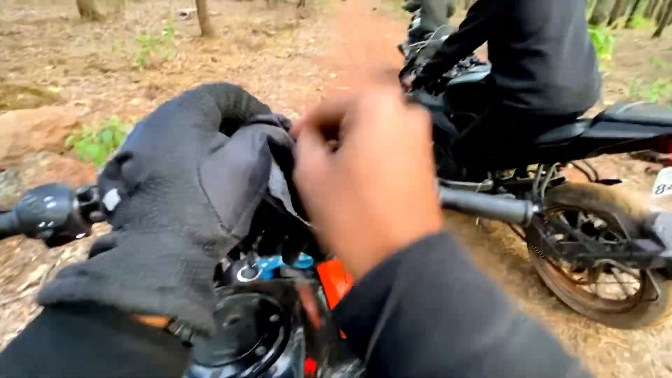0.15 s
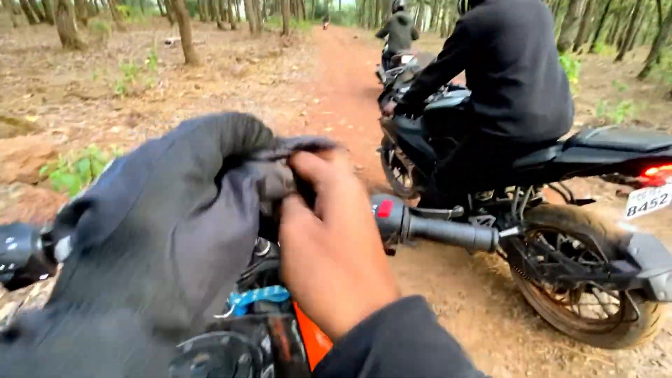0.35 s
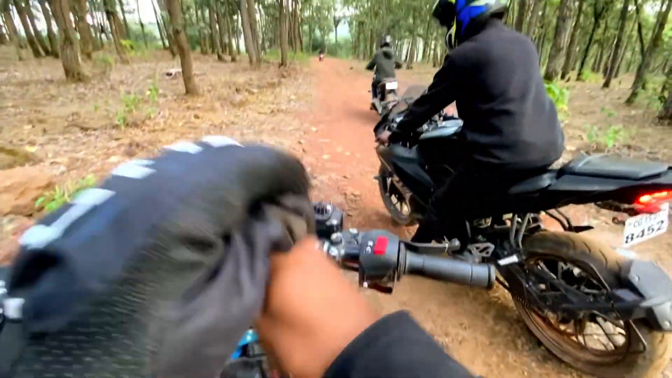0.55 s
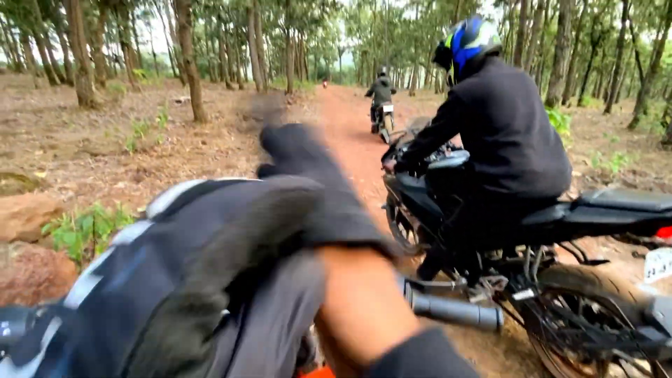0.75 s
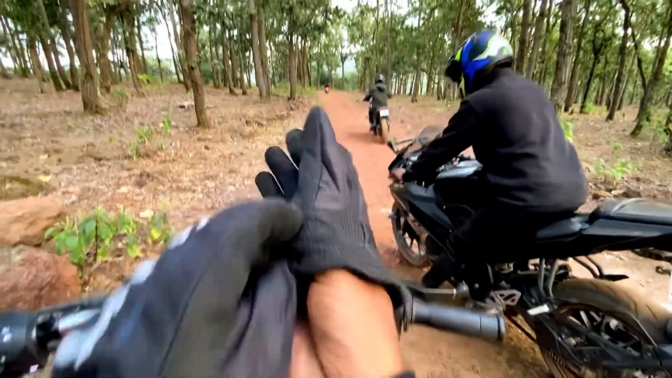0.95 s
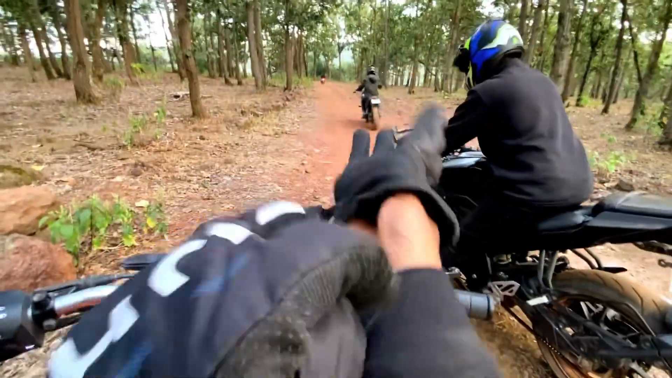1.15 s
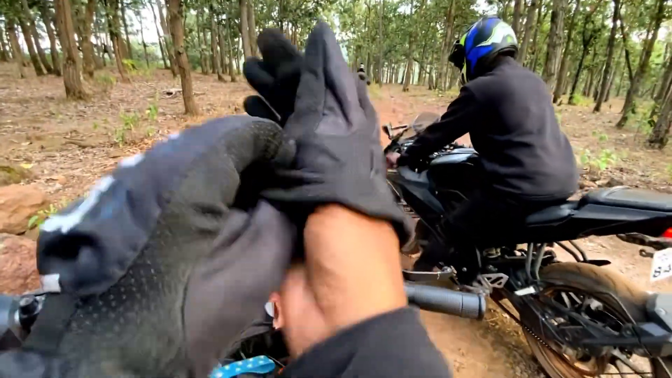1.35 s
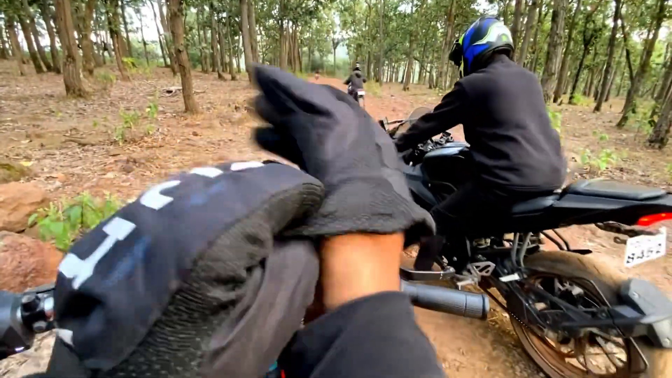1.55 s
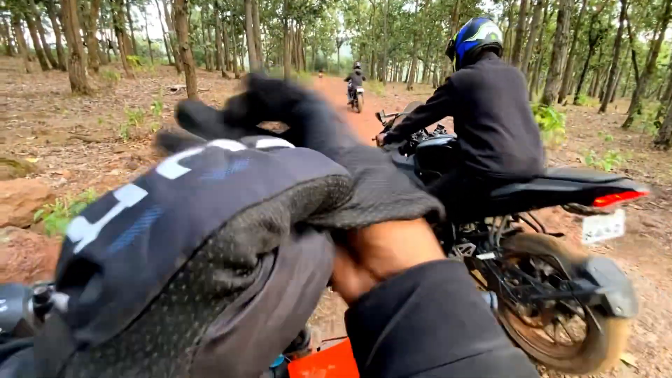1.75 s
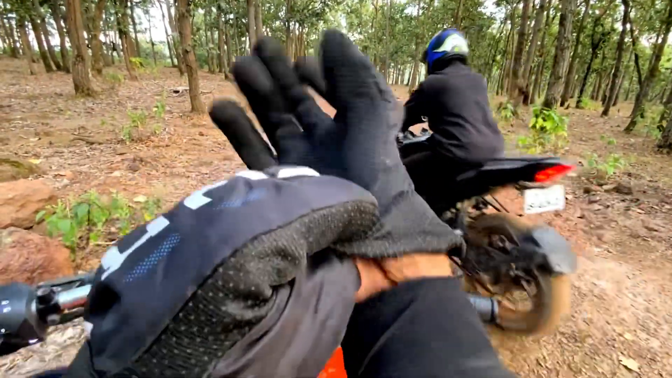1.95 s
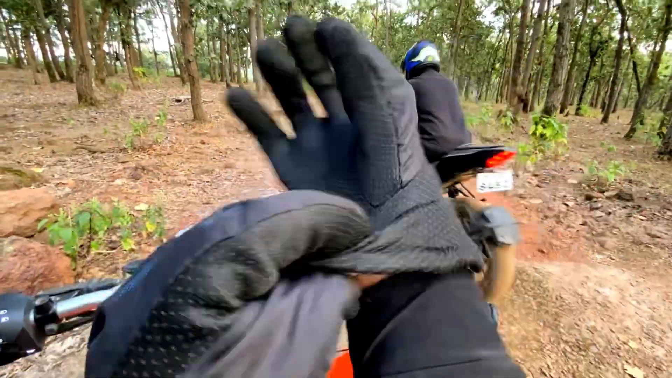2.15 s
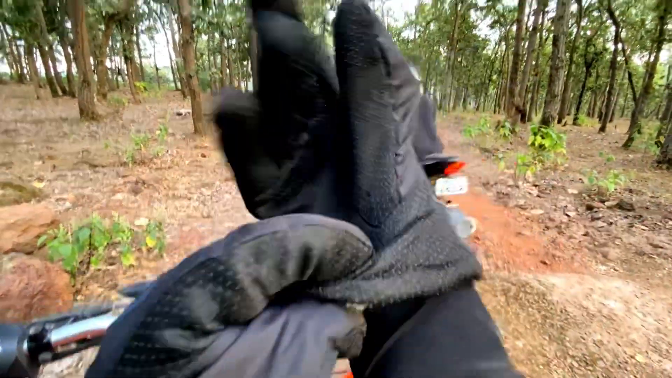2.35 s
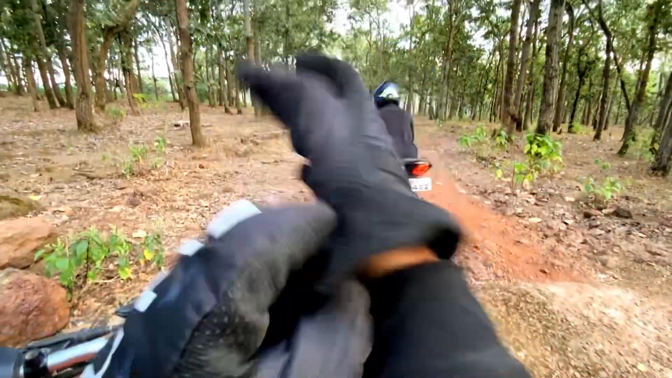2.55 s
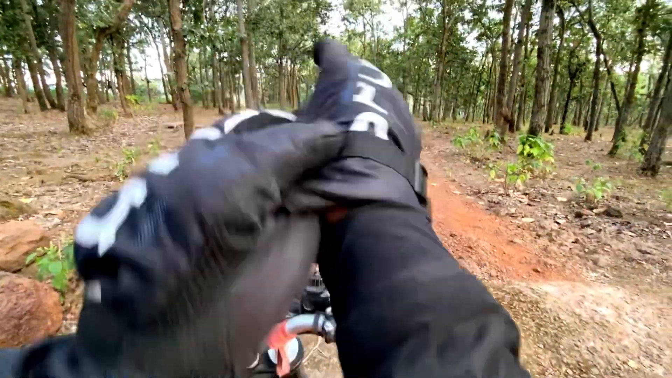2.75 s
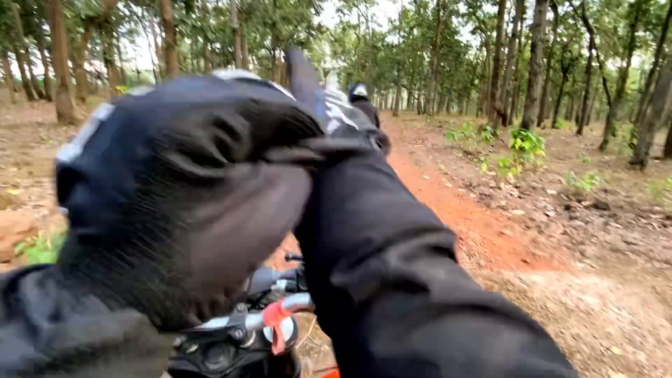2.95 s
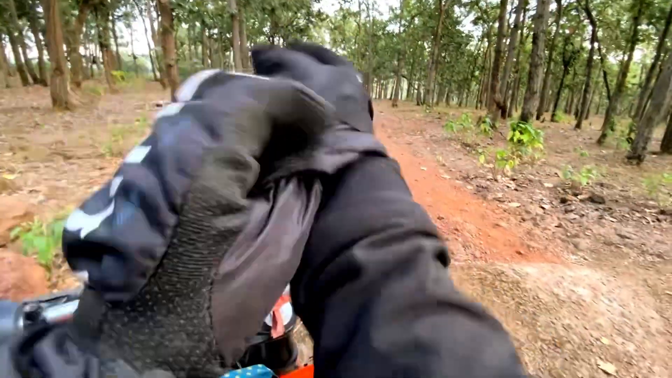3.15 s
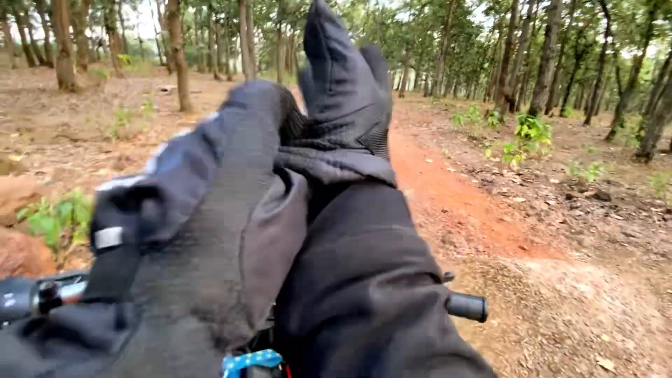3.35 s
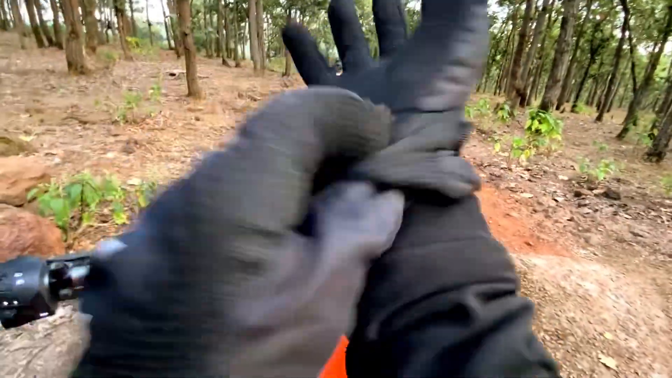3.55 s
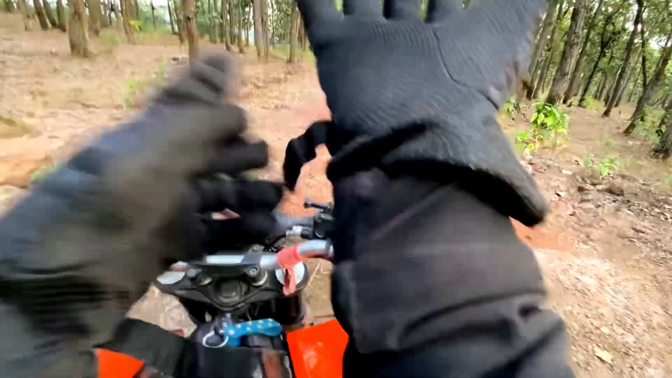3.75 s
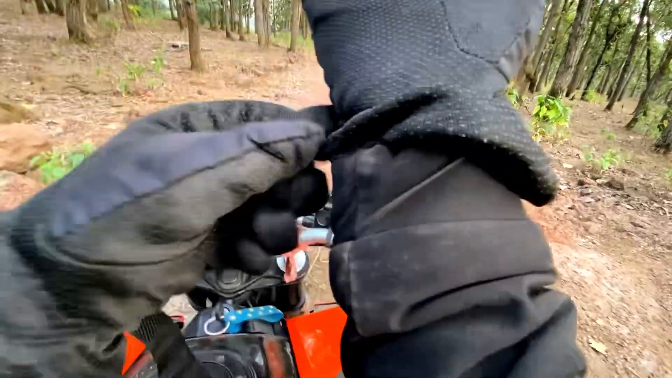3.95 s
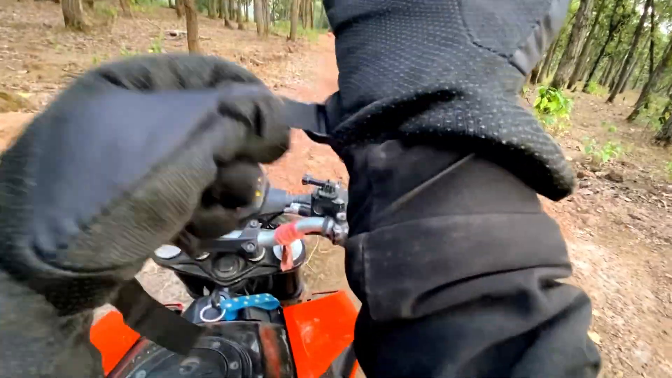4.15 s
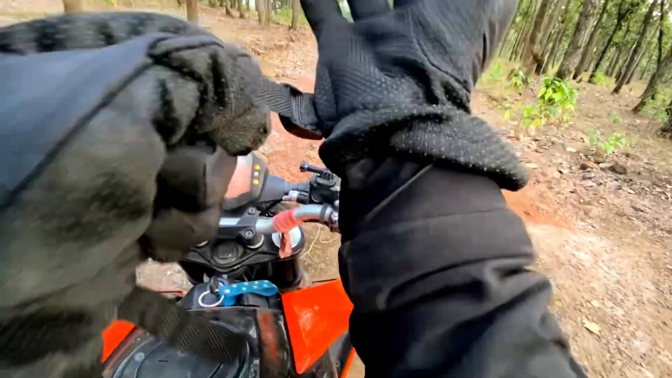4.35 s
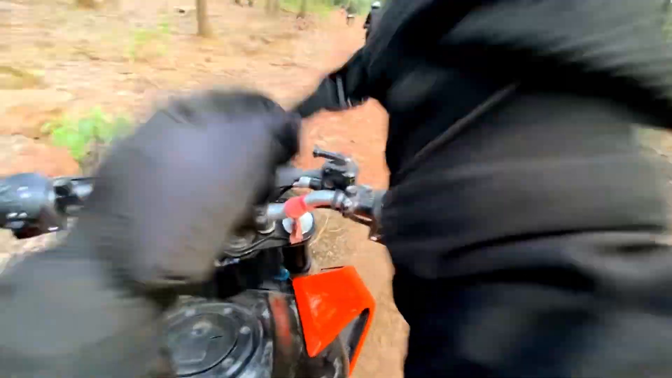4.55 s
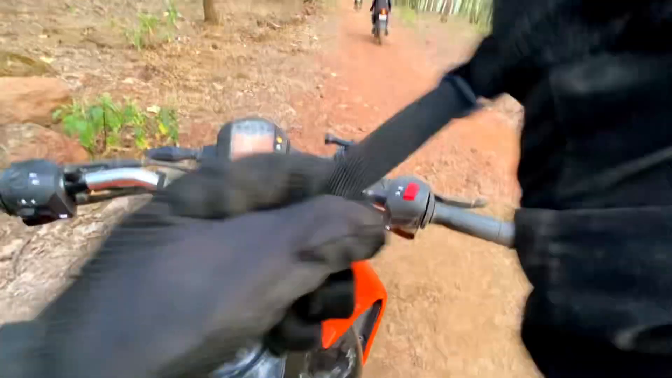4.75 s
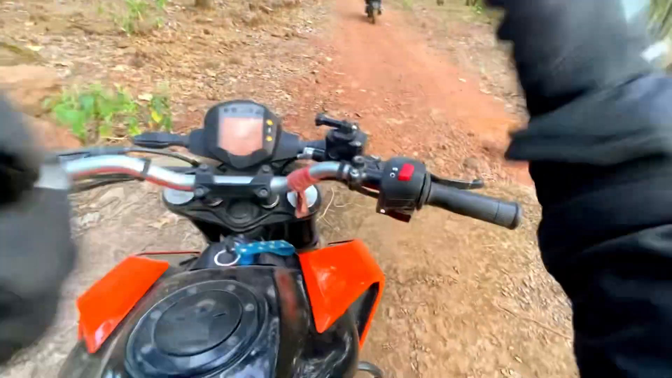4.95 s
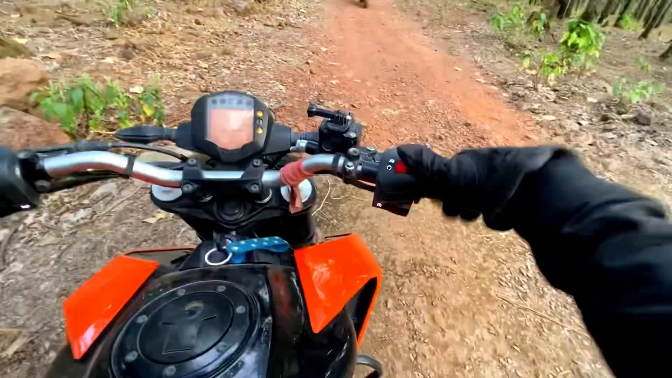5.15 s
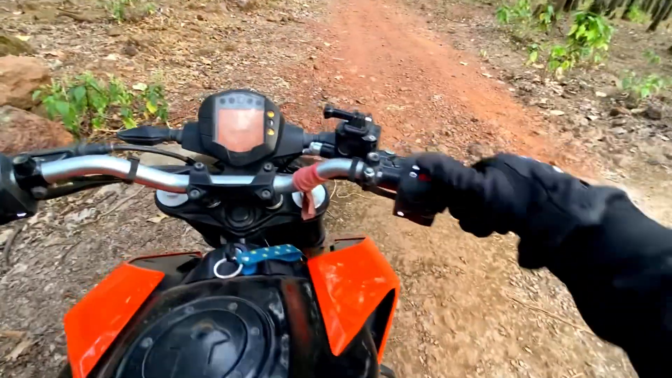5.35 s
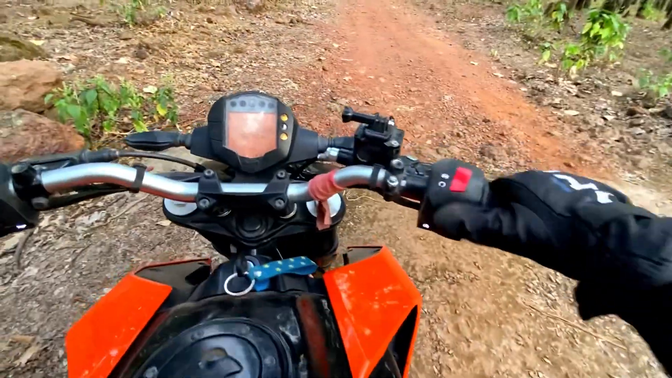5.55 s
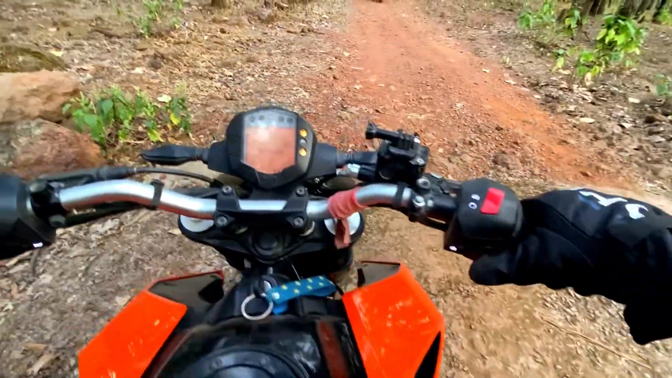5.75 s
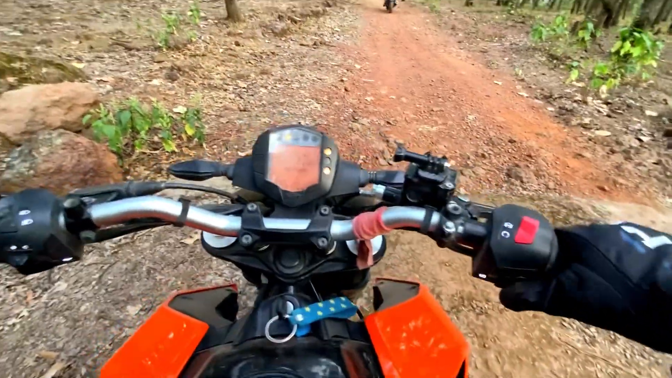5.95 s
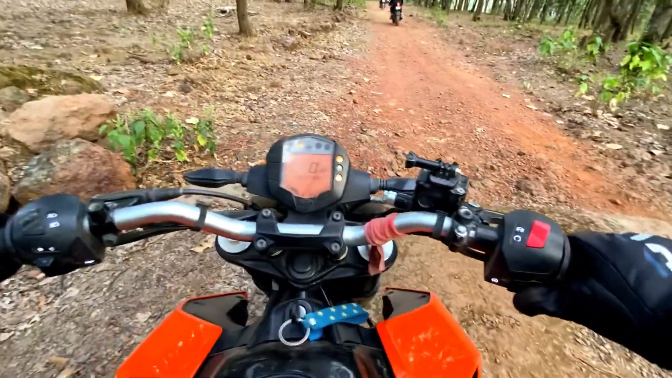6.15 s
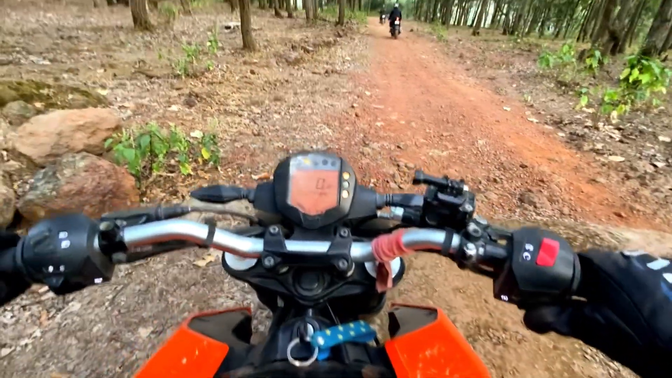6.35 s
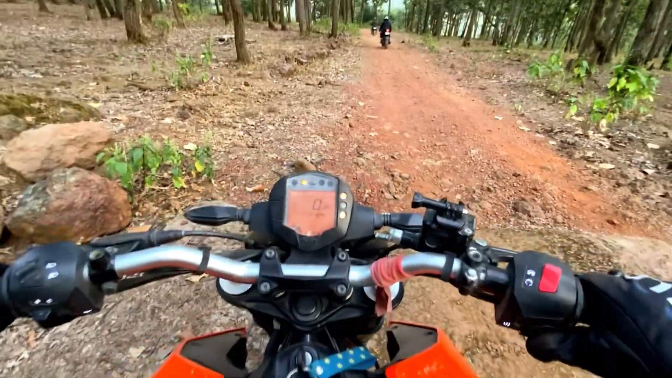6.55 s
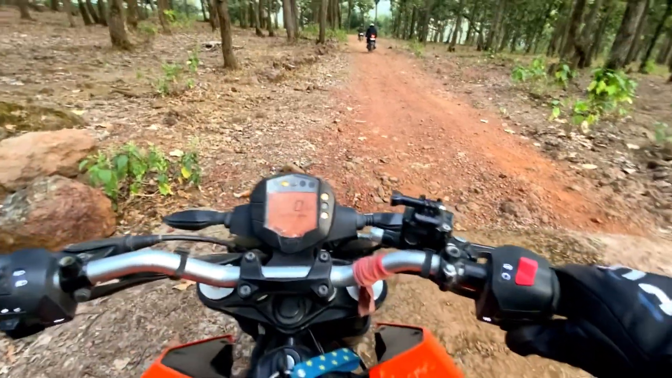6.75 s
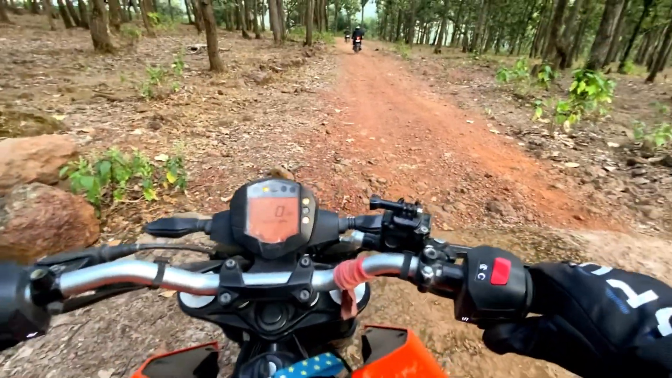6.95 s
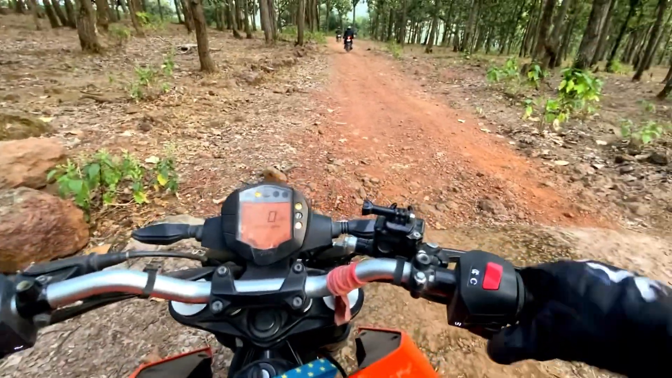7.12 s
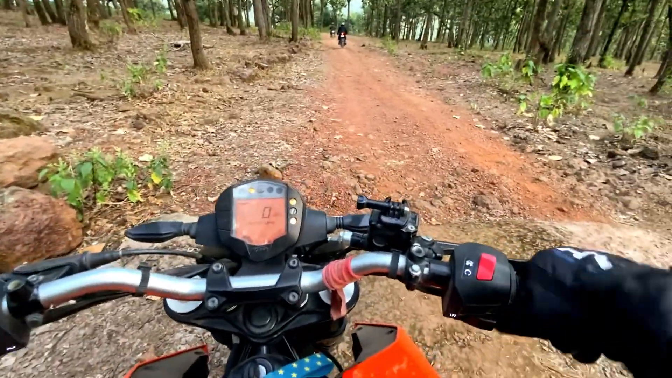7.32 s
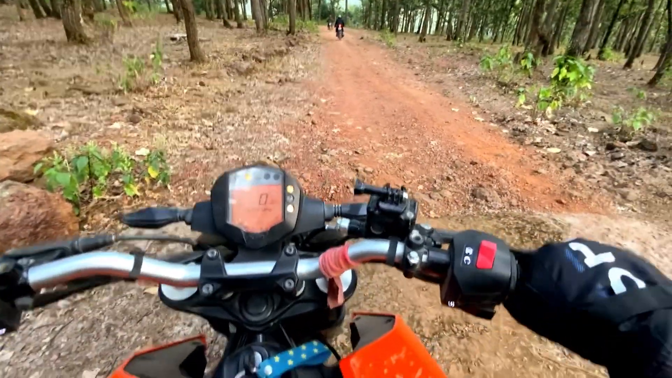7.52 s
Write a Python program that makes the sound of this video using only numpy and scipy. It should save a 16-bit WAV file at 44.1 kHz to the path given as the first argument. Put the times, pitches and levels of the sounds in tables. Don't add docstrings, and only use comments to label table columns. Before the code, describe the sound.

Muffled motorcycle idles, revs and pulls away while gloves slap and snap close by, then a starter grinds and a nearer engine fires.

```python
import sys
import numpy as np
from scipy import signal
from scipy.fft import rfft, irfft, next_fast_len
from scipy.io import wavfile
from scipy.ndimage import map_coordinates

SR = 44100
rng = np.random.default_rng(int(sys.argv[2]) if len(sys.argv) > 2 else 0)


def ratio_of_db(decibels):
    return 10 ** (np.asarray(decibels, float) / 20)


def dump(signal):
    limited = np.clip(np.atleast_2d(signal).T, -1, 1)
    pcm = np.round(limited * 32767).astype(np.int16)
    wavfile.write(sys.argv[1], SR, pcm)


N = 338688
T = np.arange(N) / SR
CRUISE = 20


def unit(x):
    return x / np.sqrt(np.mean(x ** 2) + 1e-20)


def curves(rows, t=T):
    s, *cols = np.transpose(rows)
    return [np.interp(t, s, c) for c in cols]


def wobble(rate):
    return map_coordinates(rng.standard_normal(int(N * rate / SR) + 4), [T * rate])


def filtered(x, response):
    m = next_fast_len(N + 8192)
    return irfft(rfft(x, m) * response(np.fft.rfftfreq(m, 1 / SR)), m)[:N]


def noise(spectrum):
    f, db = np.transpose(spectrum)

    def colour(hz):
        return ratio_of_db(np.interp(np.log(hz + 1), np.log(f), db))
    return unit(filtered(rng.standard_normal(N), colour))


def resonance(f, hz, width):
    return 1j * f * width / (hz * hz - f * f + 1j * f * width)


def bell(centre, half):
    return np.exp(-.5 * ((T - centre) / half) ** 2)


def crank(speed):
    turning = (T >= speed[0][0]) & (T < speed[-1][0])
    return np.cumsum(curves(speed)[0] * turning) / SR


def valve_beat(cycles, depth_db, lag):
    turn = 2 * np.pi * (cycles - lag)
    return ratio_of_db(depth_db * (np.cos(turn) + 0.21 * np.cos(2 * turn)))


def strengths(speed, load, tail, t):
    gulp_db, gulp_slope, ring_db, ring_slope, _ = tail
    revs = curves(speed, t)[0] - CRUISE
    ring_floor_db = -10.5
    late_db = np.maximum(ring_db + ring_slope * revs, ring_floor_db)
    return curves(load, t)[0], gulp_db + gulp_slope * revs, late_db


def exhaust(speed, load, tail, pipe, shell, scatter_db, gulp_s, jitter_s):
    fired = np.r_[speed[0][0], T[1:][np.diff(np.floor(crank(speed))) > 0]]
    chance = rng.standard_normal((len(fired), 14))
    bang_db, gulp_db, late_db = np.array(strengths(speed, load, tail, fired))[:, :, None]
    t = np.arange(-SR // 50, SR // 12) / SR

    bumps = []
    for k, (delay, part, width) in enumerate(pipe):
        size = part * ratio_of_db(scatter_db * chance[:, [6 + k]])
        arrival = delay + jitter_s * chance[:, [1 + k]]
        bumps.append(size * np.exp(-.5 * ((t - arrival) / width) ** 2))

    rings = 0
    for start, hz, db, t60 in shell:
        u = np.clip(t - start, 0, None)
        rings = rings + ratio_of_db(db - 60 * u / t60) * (1 - np.exp(-u / 0.0026)) * np.sin(2 * np.pi * hz * u)

    u = np.clip(t - .005, 0, None) / gulp_s
    gulp = ratio_of_db(gulp_db + 2 * scatter_db * chance[:, [12]]) * np.e * u * np.exp(-u)
    late = ratio_of_db(late_db) * (bumps[-1] + ratio_of_db(2 * scatter_db * chance[:, [13]]) * rings)
    shots = ratio_of_db(bang_db + scatter_db * chance[:, [0]]) * (sum(bumps[:-1]) + late + gulp)
    where = np.round((fired[:, None] + t) * SR).astype(int) + SR
    return np.bincount(where.ravel(), shots.ravel(), N + 2 * SR)[SR:SR + N]


def hum(speed, load, tail, orders):
    muffle_hz = 447
    bang_db, _, late_db = strengths(speed, load, tail, T)
    cycles, rate = crank(speed), curves(speed)[0]
    runs_to_end = speed[-1][0] >= T[-1]
    running = np.clip(cycles / 2, 0, 1) * np.clip((speed[-1][0] - T) * 20 + runs_to_end, 0, 1)
    tones = 0
    for k, db in orders:
        muffled = 1 / (1 + (k * rate / muffle_hz) ** 12)
        tones = tones + ratio_of_db(db + 2.1 * wobble(2.3)) * np.sin(2 * np.pi * round(k) * cycles) * muffled
    return ratio_of_db(bang_db + late_db / 2) * running * tones


# (frequency [Hz], density [dB per Hz])
HISS = [(300, -56), (800, 7), (1400, -4), (2400, -6), (3400, -13.5), (5500, -17), (9000, -20.5),
        (15500, -24.5)]


def hiss():
    return ratio_of_db(-70.5) * noise(HISS)


# (time [s], peak level [dB])
GUSTS = [(.3, -36), (1.15, -29.5), (1.45, -35), (1.86, -32), (2.46, -32.5), (2.8, -41), (3.5, -33),
         (4.62, -37), (4.9, -34.5), (6.65, -37), (6.87, -34.5), (7.25, -35), (7.68, -21.5)]
# (frequency [Hz], density [dB per Hz])
BUFFET = [(6, -14), (14, 0), (24, -3), (45, -8), (80, -18), (140, -28), (250, -120)]


def buffeting():
    breeze_db, gust_s = -41, 0.092
    gusts = ratio_of_db(breeze_db) + sum(ratio_of_db(db) * bell(s, gust_s) for s, db in GUSTS)
    return ratio_of_db(-4) * gusts * unit(noise(BUFFET) * ratio_of_db(2.3 * wobble(7.4)))


# (frequency [Hz], density [dB per Hz])
RUSH = [(40, -120), (70, -6), (130, -6), (200, -8.5), (300, -13), (410, -16.5), (500, -29), (800, -120)]


def gas_rush():
    puff_db, puff_lag = 2.5, .12
    catch_s = 0.12
    rush_rule = (-41.5, 0.25, 2.6)
    leader = ratio_of_db(curves(LEADER_LOAD)[0] + LEADER_TAIL[-1])
    neighbour = ratio_of_db(receding(rush_rule)) * valve_beat(crank(NEIGHBOUR_SPEED), puff_db, puff_lag)
    flow = np.clip((T - NEAR_SPEED[0][0]) / catch_s, .35, 1) * (T > GEARS[0][0])
    near = ratio_of_db(curves(NEAR_LOAD)[0] + NEAR_TAIL[-1]) * flow
    near = near * valve_beat(crank(NEAR_SPEED), puff_db, puff_lag)
    gas = np.sqrt(leader ** 2 + neighbour ** 2 + near ** 2)
    return ratio_of_db(-1.0) * gas * unit(noise(RUSH) * ratio_of_db(2.2 * wobble(25)))


# (time [s], half length [s], level [dB])
RUSTLES = [(0.557, 0.055, -68.5), (1.899, 0.023, -53), (2.4, 0.046, -67.5), (2.784, 0.037, -69.5),
           (3.464, 0.036, -69.5), (4.615, 0.032, -71), (4.789, 0.061, -71), (5.232, 0.015, -75)]
# (frequency [Hz], density [dB per Hz])
CLOTH = [(900, -41), (1600, 5), (2450, 1), (3500, -12), (5500, -16.5), (8000, -29), (14000, -63)]


def rustle():
    strokes = sum(ratio_of_db(db) * bell(s, half) for s, half, db in RUSTLES)
    return strokes * unit(noise(CLOTH) * ratio_of_db(4.5 * wobble(120)))


# (time [s], speed [firings per s])
LEADER_SPEED = [(0.027, 20.03), (0.25, 22.14), (0.5, 23.82), (0.75, 25.74), (0.98, 29.61), (1.2, 33.48)]
# (time [s], level [dB])
LEADER_LOAD = [(0, -25.5), (.5, -27.5), (0.801, -31), (0.949, -30.5), (1.2, -44)]
# (delay [s], size [of full], width [s])
LEADER_PIPE = [(-.004, -.4, .002), (-.0014, -.7, .0009), (.0004, .9, .0009), (.017, -.5, .002),
               (.0099, .8, .0013)]
# (start [s], frequency [Hz], level [dB], t60 [s])
LEADER_SHELL = [(-.001, 203, -9.5, 0.1), (-.001, 312, -13, 0.14), (-.001, 423, -19.5, 0.15)]
# (multiple of firing rate [1], level below the bang [dB])
LEADER_ORDERS = [(8, -24), (9, -16.5), (13, -27), (14, -26), (17, -29), (18, -29)]
# (slow gulp [dB], its change [dB per firing/s],
# shell ring [dB], its change [dB per firing/s], gas rush [dB])
LEADER_TAIL = (-4, -0.6, -0.5, -0.08, -22)


def leader_bike():
    bangs = exhaust(LEADER_SPEED, LEADER_LOAD, LEADER_TAIL, LEADER_PIPE, LEADER_SHELL,
                    scatter_db=.8, gulp_s=.005, jitter_s=.0001)
    return bangs + hum(LEADER_SPEED, LEADER_LOAD, LEADER_TAIL, LEADER_ORDERS)


# (time [s], distance [m])
NEIGHBOUR_AWAY = [(0, 1.85), (1.9, 2.04), (2.3, 2.7), (3.2, 5.1), (4.5, 10.2), (5.4, 11.6), (6.3, 43)]
# (time [s], speed [firings per s])
NEIGHBOUR_SPEED = [(0.0669, 12.69), (0.533, 10.25), (1.337, 22.76), (1.626, 22.78), (1.795, 21.22),
                   (2.026, 16.59), (2.397, 16.76), (2.612, 18.82), (3.067, 20.14), (3.551, 20.06),
                   (4.518, 22.94), (4.781, 14.11), (4.942, 15.4), (5.19, 13.81), (5.912, 12.9),
                   (6.397, 17.85), (6.519, 17.83), (6.7, 16.72)]


def receding(rule):
    db, per_rev, per_doubling = rule
    revs = curves(NEIGHBOUR_SPEED)[0] - CRUISE
    return db + per_rev * revs - per_doubling * np.log2(curves(NEIGHBOUR_AWAY)[0] / 2)


# (frequency [Hz], density [dB per Hz])
CASING = [(300, -120), (480, 0.5), (650, -4), (850, -2), (1100, -8.5), (1350, -8), (1550, -24.5),
          (2200, -40.5), (3000, -120)]
# (frequency [Hz], density [dB per Hz])
CLATTER = [(900, -63.5), (1400, 0.5), (1850, 3), (2400, -4.5), (2900, -9.5), (3500, -14.5), (4300, -18.5),
           (5400, -26), (7000, -32), (10000, -44), (16000, -58)]


def neighbour_rattle():
    cycles, body = crank(NEIGHBOUR_SPEED), noise(CASING)
    low = unit(filtered(body, lambda f: .2 + resonance(f, 800, 300)))
    high = unit(filtered(body, lambda f: .2 + resonance(f, 1100, 300)))
    share = np.interp(curves(NEIGHBOUR_SPEED)[0], [12, 23.6], [0, 1])
    casing = (1 - share) * low + share * high
    casing = unit(casing * valve_beat(cycles, 1, .9) * ratio_of_db(1.0 * wobble(60)))
    clatter = unit(noise(CLATTER) * valve_beat(cycles, 2.6, .88) * ratio_of_db(2 * wobble(150)))
    return ratio_of_db(receding((-53.5, .4, 2.61))) * casing + ratio_of_db(receding((-56.5, 0.85, 8.2))) * clatter


def gear_mesh():
    turn = 2 * np.pi * 48 * crank(NEIGHBOUR_SPEED)
    blur_rate = 110
    tone = wobble(blur_rate) * np.cos(turn) + wobble(blur_rate) * np.sin(turn)
    level = ratio_of_db(receding((-62.5, .6, 1.8)) + 1.5 * wobble(5))
    return level * (T < NEIGHBOUR_SPEED[-1][0]) * tone


# (time [s], level [dB])
NEIGHBOUR_LOAD = [(0, -26.5), (.6, -21), (1.001, -16.5), (1.75, -17.5), (2, -18.5), (2.6, -19),
                  (2.9, -21.5), (3.7, -24.5), (4.502, -30), (4.65, -32.5), (5, -39.5), (5.12, -33.5),
                  (5.4, -31), (5.75, -34), (6.3, -34.5), (6.85, -45)]
# (delay [s], size [of full], width [s])
NEIGHBOUR_PIPE = [(-.0055, -.3, .002), (-.0037, -.82, .0012), (-.0005, 1, .0018), (.0039, -.72, .0016),
                  (.0079, .4, .002)]
# (start [s], frequency [Hz], level [dB], t60 [s])
NEIGHBOUR_SHELL = [(-.011, 333, -25, 0.073), (-.009, 423.3, -32.5, 0.063), (-.0073, 235, -13.5, 0.019),
                   (0.0149, 108, -16, 0.13)]
# (multiple of firing rate [1], level below the bang [dB])
NEIGHBOUR_ORDERS = [(2, -22), (15, -38), (17, -39), (18, -34), (19, -39)]
NEIGHBOUR_TAIL = (-16, -1.1, 0.5, 2.13, -23)


def neighbour_bike():
    dull_hz, dulling = 271, ratio_of_db(receding((0.96, 0, 1.6)))
    bangs = exhaust(NEIGHBOUR_SPEED, NEIGHBOUR_LOAD, NEIGHBOUR_TAIL, NEIGHBOUR_PIPE, NEIGHBOUR_SHELL,
                    scatter_db=.4, gulp_s=.006, jitter_s=.0001)
    upper = filtered(bangs, lambda f: 1 / (1 + (dull_hz / (f + 1)) ** 6))
    bangs = bangs + (dulling - 1) * upper
    tones = dulling * hum(NEIGHBOUR_SPEED, NEIGHBOUR_LOAD, NEIGHBOUR_TAIL, NEIGHBOUR_ORDERS)
    return bangs + tones + neighbour_rattle() + gear_mesh()


def contact(hz, t60, crack_db):
    t = np.arange(SR // 5) / SR
    puff = rng.standard_normal(len(t)) * ratio_of_db(-60 * t / t60) + 12 * (t == 0)
    span = 1 + np.clip(.022 / t60, .1, 1.2) + 40 / hz
    band = signal.butter(3, [hz / span, hz * span], "bandpass", fs=SR, output="sos")
    ring = signal.sosfilt(band, puff)
    dull = signal.butter(2, [900, 5000], "bandpass", fs=SR, output="sos")
    crack = signal.sosfilt(dull, rng.standard_normal(len(t)) * ratio_of_db(-60 * t / .012))
    return ring / np.abs(ring).max() + ratio_of_db(crack_db - 1) * crack


# (time [s], peak level [dB], tone [Hz])
THRUMS = [(7.485, -39.5, 490), (7.565, -43, 650), (7.56, -42, 1300), (7.61, -41, 1105)]
SLAPS = [(1.731, -33.5, 790), (1.731, -31.5, 281), (3.777, -27, 920), (3.777, -25, 290), (4.481, -44, 620)]
GLOVES = [(0.1, -48, 1440), (2.39, -42, 456), (2.784, -51, 984), (3.852, -46.5, 1500), (4.608, -42, 485),
          (4.856, -53, 1055), (5.12, -47, 1300), (5.174, -51, 2230), (5.283, -57, 740), (5.665, -51, 830),
          (5.827, -56, 850), (6.048, -54, 760)]
SNAPS = [
    (1.856, -47.5, 2380),
    (1.89, -48, 2430),
    (1.945, -50, 2300),
    (2.6, -59, 3000),
    (5.424, -42, 1800),
    (5.424, -44, 2250),
    (5.424, -46, 4200),
    (5.424, -56, 850),
]
KNOCKS = [(6.39, -38.5, 440), (6.55, -38.5, 333), (6.578, -32.5, 111), (6.625, -42.5, 410),
          (6.757, -30.5, 125), (6.855, -31.5, 1010)]


def taps():
    out = np.zeros(N + SR)
    kinds = [(THRUMS, 0.32, -45), (SLAPS, .055, -32), (GLOVES, 0.071, -28.5),
             (SNAPS, 0.021, -25), (KNOCKS, 0.15, -42)]
    for rows, t60, crack_db in kinds:
        for s, db, hz in rows:
            hit = contact(hz, t60, crack_db)
            out[round(s * SR):][:len(hit)] += ratio_of_db(db) * hit
    return out[:N]


# (time [s], level [dB])
GEARS = [(6.385, -58.5), (6.423, -43), (6.54, -40.5), (6.6, -46), (6.845, -47), (6.885, -44.5), (7.4, -46),
         (7.68, -45.5)]
# (frequency [Hz], width [Hz], level [dB])
CRANKCASE = [(440, 120, -3.5), (850, 153, -5), (1200, 114, -1.5), (1820, 222, -2), (2250, 313, -3),
             (2542, 227, -3), (3350, 450, -15.5), (4000, 610, -19.5), (4960, 1400, -28), (7000, 410, -35)]
# (start [s], end [s], whine from [Hz], whine to [Hz], whine level [dB])
STRAIN = [
    (6.437, 6.468, 1290, 1200, -49.5),
    (6.473, 6.52, 3800, 4400, -64),
    (6.514, 6.553, 1830, 1332, -44),
    (6.538, 6.58, 3800, 4000, -62),
    (6.696, 6.741, 2250, 1810, -37),
    (6.854, 6.876, 2150, 1920, -34.5),
]
# (frequency [Hz], density [dB per Hz])
SPRAY = [(1500, -67), (3000, 1), (4500, -1), (6000, -11), (8000, -16), (10500, -28), (12500, -53),
         (16000, -92)]
# (frequency [Hz], density [dB per Hz])
SLIP = [(2500, -40), (4000, -3), (5500, 1), (7500, -3), (9500, -9), (11000, -30), (16000, -71)]


def near_starter():
    grind_db, swell_db = -6.5, 3

    def case(f):
        modes = 0
        for k, (hz, width, db) in enumerate(CRANKCASE):
            modes = modes + (-1) ** k * ratio_of_db(db) * resonance(f, hz, width)
        return modes / (1 + 1j * f / 6000)

    teeth = unit(filtered(rng.standard_normal(N) * ratio_of_db(1.9 * wobble(300)), case))
    level = ratio_of_db(curves(GEARS)[0] - 3.5) * (T > GEARS[0][0]) * valve_beat(crank(NEAR_SPEED), 0.5, 0.87)
    grind, whine = np.zeros(N), np.zeros(N)
    waver_hz, flutter_db = 70 * wobble(150), 4.5 * wobble(120)
    for start, end, from_hz, to_hz, whine_db in STRAIN:
        gate = np.clip(np.minimum(T - start, end - T) / 0.0027, 0, 1)
        grind += ratio_of_db(whine_db + grind_db) * gate
        hz = np.interp(T, [start, end], [from_hz, to_hz]) + waver_hz
        swell = swell_db * np.interp(T, [start, end], [-1, 0])
        whine += ratio_of_db(whine_db + flutter_db + swell) * gate * np.sin(2 * np.pi * np.cumsum(hz) / SR)
    spin_up = np.sqrt(np.interp(T, [6.425, 6.49, 6.57], [0, 1, 0]))
    slip = ratio_of_db(-67) * spin_up * noise(SLIP)
    return (level + grind) * teeth + ratio_of_db(-13) * grind * noise(SPRAY) + slip + whine


# (time [s], speed [firings per s])
NEAR_SPEED = [(6.8999, 9.07), (6.963, 13.69), (7.1, 21.04), (7.229, 21.36), (7.458, 19.17), (7.514, 21.3),
              (7.68, 29.56)]
# (time [s], level [dB])
NEAR_LOAD = [(6.9, -17.5), (7.1, -19.5), (7.25, -21), (7.4, -22.5), (7.55, -18), (7.68, -18.5)]
# (delay [s], size [of full], width [s])
NEAR_PIPE = [(-.0055, -.4, .002), (-.0033, -.75, .001), (-.0006, .95, .0014), (.0036, -.65, .0013),
             (.0066, .4, .0016)]
# (start [s], frequency [Hz], level [dB], t60 [s])
NEAR_SHELL = [(-.0062, 285, -17, 0.076), (-.004, 410.5, -20, 0.092), (-.002, 520, -22, .06),
              (0.014, 96, -22.5, 0.072)]
# (multiple of firing rate [1], level below the bang [dB])
NEAR_ORDERS = [(4, -15), (13, -30), (15, -31), (16, -26), (18, -30), (20, -29)]
NEAR_TAIL = (-9.5, 0, 1, 0.12, -22.5)


def near_bike():
    bangs = exhaust(NEAR_SPEED, NEAR_LOAD, NEAR_TAIL, NEAR_PIPE, NEAR_SHELL,
                    scatter_db=.6, gulp_s=.006, jitter_s=.00015)
    return near_starter() + bangs + hum(NEAR_SPEED, NEAR_LOAD, NEAR_TAIL, NEAR_ORDERS)


def scene():
    background = hiss() + buffeting() + gas_rush() + rustle()
    return (background + leader_bike() + neighbour_bike() + taps() + near_bike())[None]


def roll_off(x):
    return signal.sosfilt(signal.butter(12, 15741, fs=SR, output="sos"), x)


def record(dry):
    mix = filtered(dry[0], lambda hz: 1j * hz / (1j * hz + 14))[None]
    return roll_off(mix)


dry = scene()
out = record(dry)
dump(out)
```